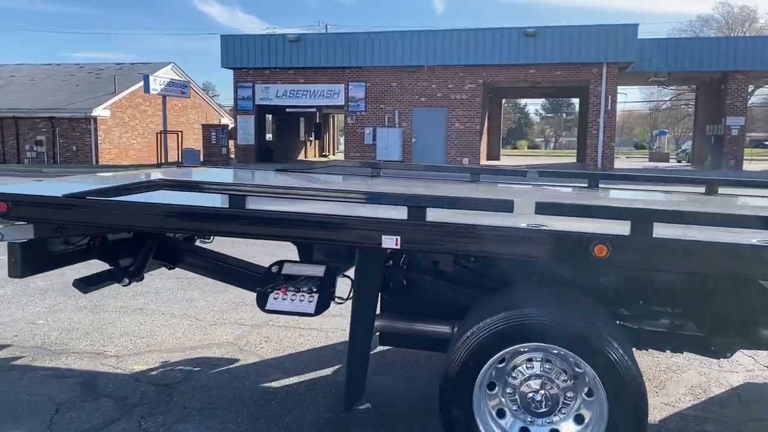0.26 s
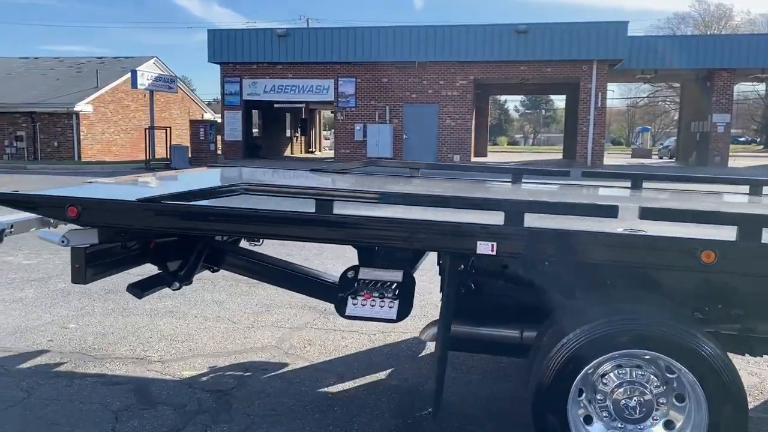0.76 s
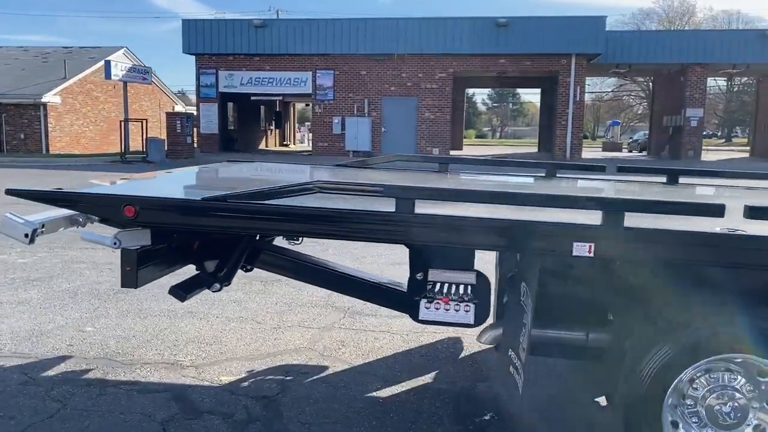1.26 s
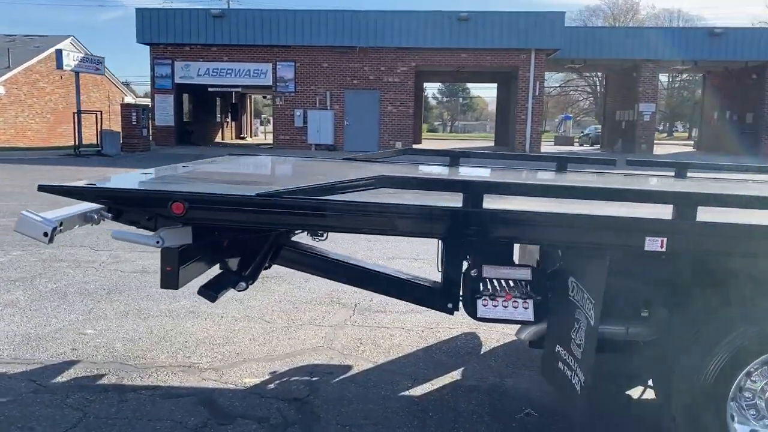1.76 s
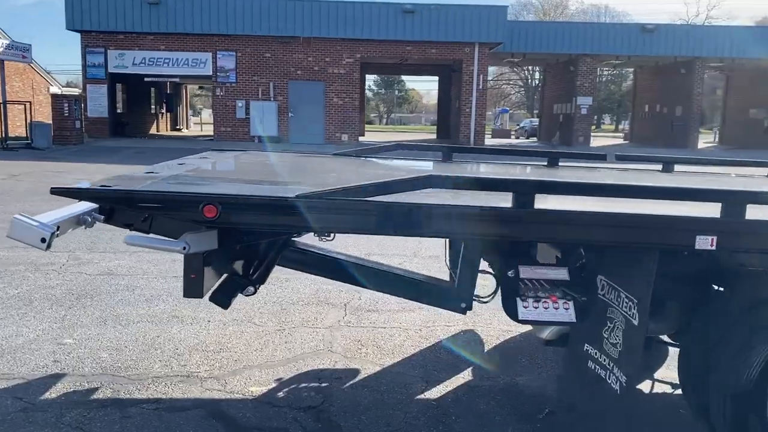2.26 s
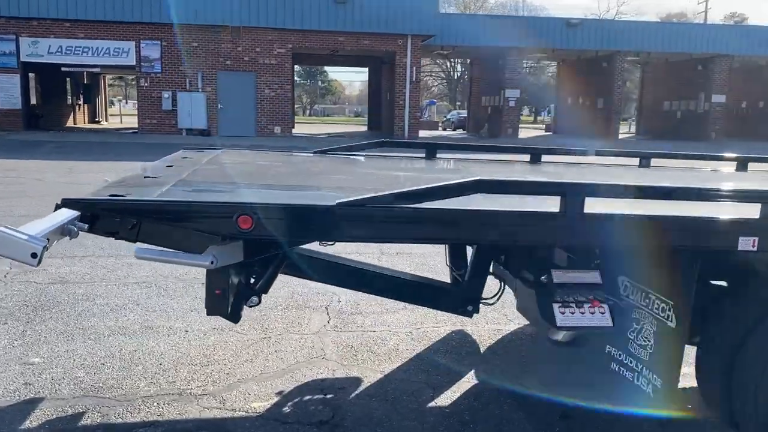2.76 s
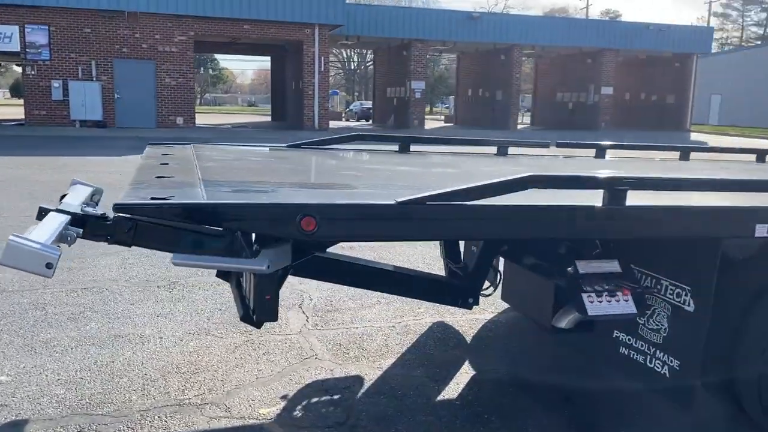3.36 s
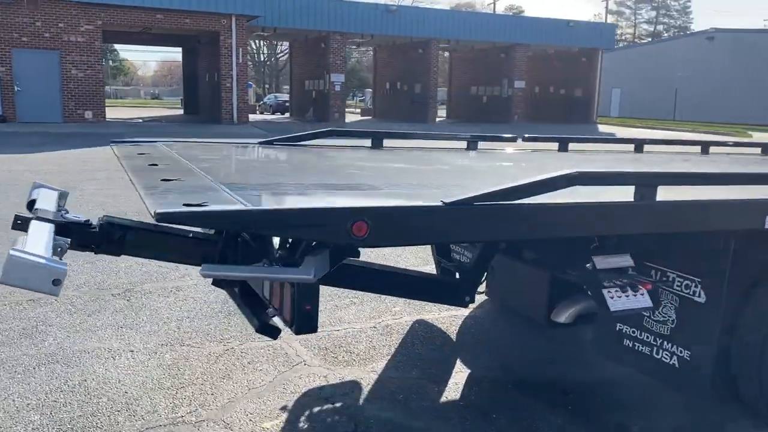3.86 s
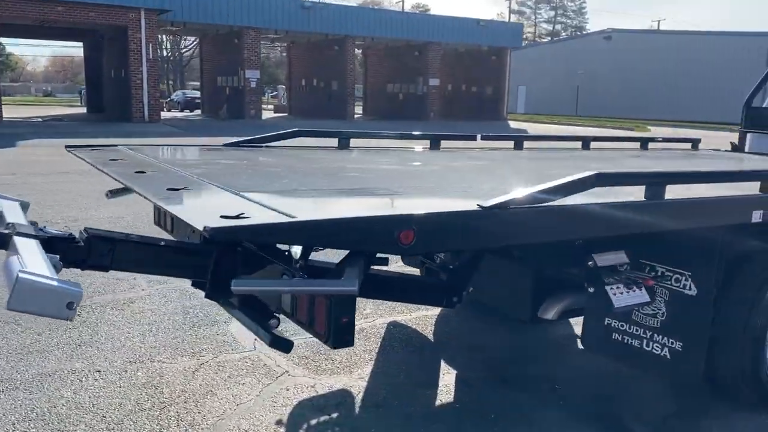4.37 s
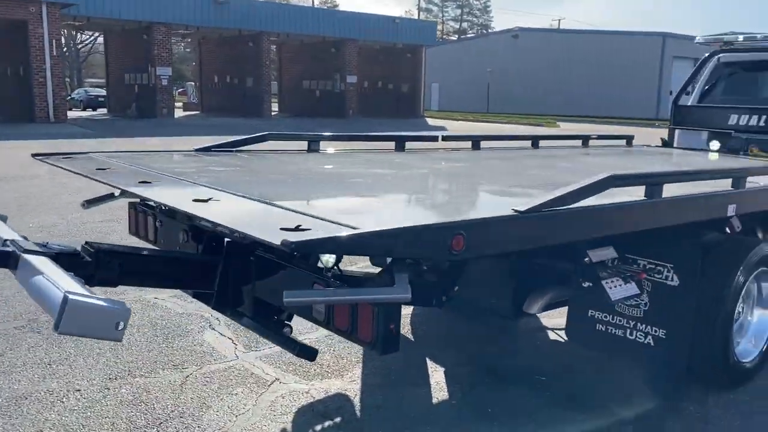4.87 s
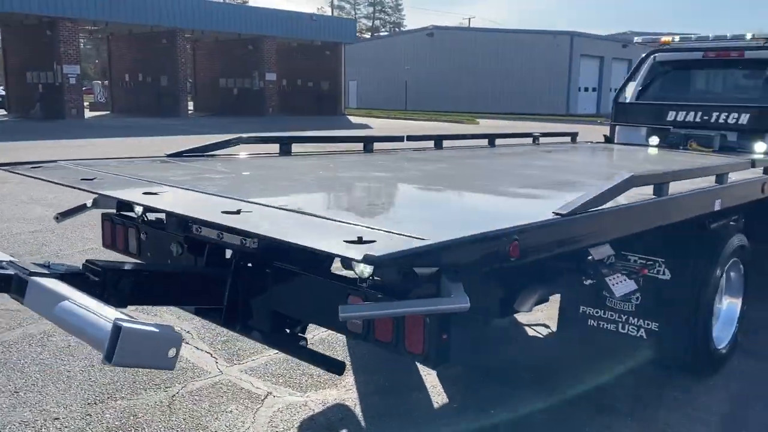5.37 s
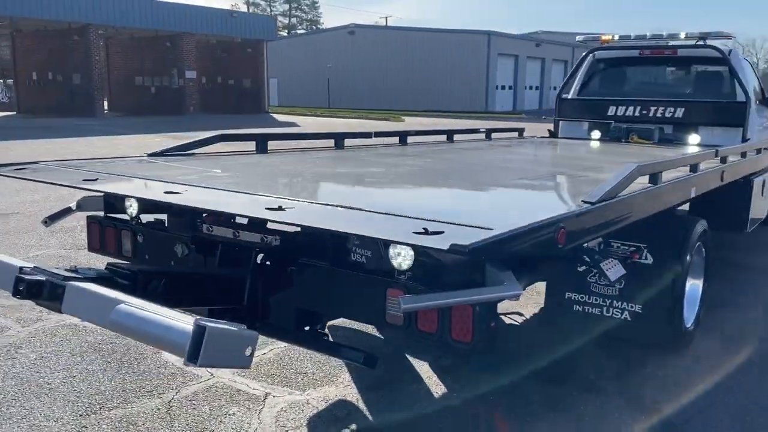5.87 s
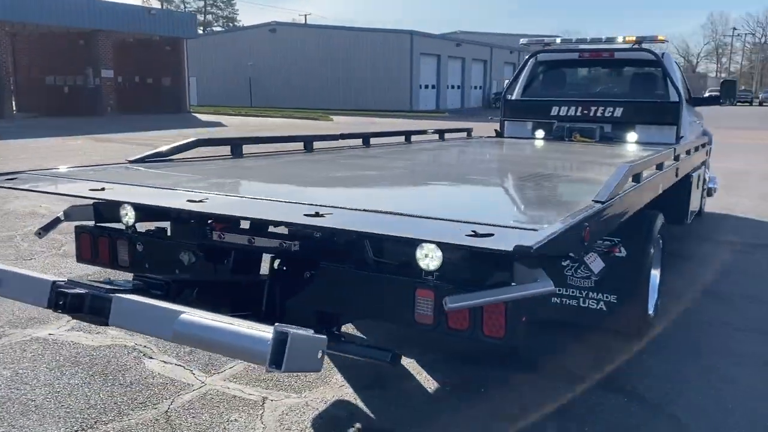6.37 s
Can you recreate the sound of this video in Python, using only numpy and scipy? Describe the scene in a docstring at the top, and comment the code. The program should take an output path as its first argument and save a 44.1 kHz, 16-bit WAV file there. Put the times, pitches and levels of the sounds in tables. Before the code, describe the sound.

Heard by someone walking along it outdoors, a diesel truck idles steadily with a low pulsing hum, growl and clatter, plus faint whine and hiss. Puffs of exhaust hit the microphone with low thumps, and the low end drops for a moment. After a single metallic tick and a light rattle, the highs soften and the deep hum grows stronger at the rear.

```python
"""A six-cylinder diesel tow truck idles on an open lot; the listener walks from its side to the rear.
From the start the exhaust hums and throbs, the engine growls and knocks, belt and pump whine, a fan hisses.
From 2.3 to 3.8 s the exhaust stream buffets the microphone; as that ends, the bass dips briefly.
At 4.3 s metal ticks once. Round the rear corner loose parts rattle and the body shades the treble.
The walk ends behind the truck, where the hum is loudest."""
import sys
import numpy as np
from scipy import signal
from scipy.fft import rfft, irfft
from scipy.io import wavfile
from scipy.ndimage import uniform_filter1d

SR = 44100
rng = np.random.default_rng(int(sys.argv[2]) if len(sys.argv) > 2 else 0)


def to_wav(sig):
    """Store sig (one row per channel, or 1-D mono) as 16-bit WAV at the path in sys.argv[1].

    Samples outside -1..1 are clipped; the rate is SR.
    """
    pcm = np.clip(np.atleast_2d(sig), -1, 1) * 32767
    pcm = np.round(pcm).astype(np.int16)
    wavfile.write(sys.argv[1], SR, pcm.T)  # frames by channels


N = 291920
TIME = np.arange(N) / SR
BINS_HZ = np.arange(N // 2 + 1) * SR / N
CYCLE_HZ, CYLINDERS, FIRST_FIRING_S = 5.82, 6, 0.02472


def from_db(db):
    return 10 ** (np.asarray(db) / 20)


def unit_rms(x):
    return x / np.sqrt(np.mean(x ** 2) + 1e-20)


def swell(at_s, width_s, t=TIME):
    """Bell curve of height 1."""
    return np.exp(-.5 * ((t - at_s) / width_s) ** 2)


def envelope(start_s, attack_s, hold_s, release_s):
    """Linear rise to 1, hold, exponential release."""
    age_s = TIME - start_s
    return np.clip(age_s / attack_s, 0, 1) * np.exp(-np.maximum(age_s - attack_s - hold_s, 0) / release_s)


def drift(rate_hz):
    """Smooth random motion, rms 1."""
    return unit_rms(irfft(rfft(rng.standard_normal(N)) / (1 + (BINS_HZ / rate_hz) ** 2) ** 2, N))


def resonance(x, hz, width_hz):
    """Two-pole resonator, peak gain 1."""
    r = np.exp(-np.pi * width_hz / SR)
    feedback = [1, -2 * r * np.cos(2 * np.pi * hz / SR), r * r]
    return signal.lfilter(np.array([1, 0, -1]) * (1 - r * r) / 2, feedback, x)


def per_bin(rows):
    """Table columns interpolated over log frequency."""
    hz, *columns = np.transpose(rows)
    return [np.interp(np.log(np.maximum(BINS_HZ, 1)), np.log(hz), column) for column in columns]


def colour(x, spectrum):
    """Spectral shaping with 24 dB/octave skirts."""
    db, = per_bin(spectrum)
    hz = np.maximum(BINS_HZ, 1)
    skirts = np.minimum(1, np.minimum(hz / spectrum[0][0], spectrum[-1][0] / hz)) ** 4
    return irfft(rfft(x) * from_db(db) * skirts, N)


# Stereo image: f/Hz, coherence/0-1, left lead/rad, left minus right/dB
PORT_IMAGE = [(60, .8, .05, .5), (200, .8, .3, .5), (420, .7, .9, 1.3), (520, .68, 1.1, .8),
              (700, .58, 1.9, -1.4), (860, .25, 1.8, -.6), (1100, .56, 1.4, -1.8), (1400, .68, 2.05, -.8),
              (1900, .48, 1.3, 2.3), (2250, .15, 0, 4.5), (2800, .6, -.8, 6), (3300, .75, -.6, 4.5),
              (3700, .92, 0, 3.5), (5500, .85, 0, 4), (7500, .8, 0, .5), (8500, .25, 0, 0)]


def at_ports(pair):
    """Direct and scattered signal to the left and right microphone ports, rms 1."""
    coherence, lead_rad, balance_db = per_bin(PORT_IMAGE)
    sides = np.array([[1], [-1]])
    direct, scattered = rfft(pair)
    both = np.sqrt(1 + coherence) * direct + np.sqrt(1 - coherence) * scattered * sides
    return unit_rms(irfft(both * from_db(sides * balance_db / 2) * np.exp(.5j * sides * lead_rad), N))


# Listener's path: t/s, share of the way from side to rear/0-1
WALK_PATH = [(0, 0.2), (2.8, 0.08), (4.2, 0.47), (6.62, 1)]


def along_walk(side, rear):
    """Crossfade of a level or signal from beside the truck to behind it."""
    return side + (rear - side) * np.interp(TIME, *np.transpose(WALK_PATH))


def side_to_rear(pair, side_spectrum, rear_spectrum):
    """Stereo noise whose colour follows the walk."""
    return along_walk(at_ports(colour(pair, side_spectrum)), at_ports(colour(pair, rear_spectrum)))


def near_db():
    """Boost over the first steps, nearer the engine."""
    return 2 * swell(at_s=0, width_s=0.63)


def treble_gain(shade_from_s=4.5, shade_db_per_s=3.5):
    """Up near the engine; shaded by the body past the corner."""
    return from_db(near_db() - shade_db_per_s * np.maximum(TIME - shade_from_s, 0))


def cyclic_noise(repeat_share, turns):
    """Noise pair that partly recurs every engine cycle, its pattern slowly changing."""
    period = round(SR / CYCLE_HZ)
    first, second = rng.standard_normal((2, 2, period))[:, :, np.arange(N) % period]
    angle = 2 * np.pi * turns * TIME / TIME[-1]
    pattern = first * np.cos(angle) + second * np.sin(angle)
    return np.sqrt(repeat_share) * pattern + np.sqrt(1 - repeat_share) * rng.standard_normal((2, N))


def firing_bursts(cylinder_db, delay_s, decay_s, depth, uneven_db):
    """Gain that swells and decays at each firing; cylinders and cycles differ."""
    firing_hz = CYCLE_HZ * CYLINDERS
    firings = (TIME - FIRST_FIRING_S - delay_s) * firing_hz
    number = np.floor(firings).astype(int)
    age = (firings - number) / firing_hz / decay_s
    chance_db = uneven_db * np.clip(rng.standard_normal(N)[number], -2, 1)
    size = from_db(np.array(cylinder_db)[number % CYLINDERS] + chance_db)
    return 1 - depth + depth * unit_rms(size * age * np.exp(-age))


# Six firings on the block: relative level/dB
BLOCK_FIRINGS_DB = [1.7, 5.3, 3.5, 4.2, 1.5, 3.1]


def block_bursts(**shape):
    """Firing pulsation of the engine block."""
    return firing_bursts(BLOCK_FIRINGS_DB, **shape)


def high_hiss(level_db=-70):
    """Faint, steady, very high hiss around 11 kHz."""
    spectrum = [(8500, -56), (10500, 34), (12000, 24), (15500, -11)]   # f/Hz, relative level/dB
    return from_db(level_db) * at_ports(colour(rng.standard_normal((2, N)), spectrum))


def whistle(hz=7450, width_hz=420, level_db=-66):
    """Airy narrow-band noise, strongest at the corner."""
    band = resonance(rng.standard_normal((2, N)), hz, width_hz)
    band = resonance(band, hz, width_hz)
    return from_db(level_db) * swell(at_s=4.2, width_s=1.25) * at_ports(band)


def tone(hz, wobble_hz, flutter_db):
    """Slightly unsteady stereo tone, rms 1."""
    phase = 2 * np.pi * np.cumsum(hz + wobble_hz * drift(23)) / SR
    direct = np.cos(phase) * from_db(flutter_db * drift(16))
    scattered = np.sin(phase) * drift(27)
    return at_ports(np.array([direct, scattered]))


def beam_gain(side_db, rear_db, beams):
    """A tone swells wherever it beams at the listener."""
    boost_db = sum(db * swell(at_s, width_s) for at_s, width_s, db in beams)
    return from_db(along_walk(side_db, rear_db) + boost_db)


# Pump pitch: t/s, f/Hz
PUMP_CURVE = [(0, 1920), (0.4, 1920), (0.7, 1923), (2.3, 1924.5), (2.7, 1926), (4.6, 1927.5), (5.0, 1930),
              (6.62, 1929.5)]
# Pump harmonics: multiple, side level/dB, rear level/dB, beams [t/s, width/s, boost/dB]
PUMP_HARMONICS = [(1, -71, -66, [(.62, .11, 12), (1.95, .14, 13), (4.8, .5, 7)]),
                  (2, -71, -77, [(.55, .35, 11.5), (2.38, .14, 8), (2.95, .45, 8.5), (3.8, .2, 5)]),
                  (3, -70, -77, [(2.5, .3, 4), (4.05, .22, 9), (4.72, .3, 8.5)]),
                  (4, -72, -77, [(.3, .2, 7), (3.95, .16, 7), (5.05, .2, 4)])]


def pump():
    """Thin whine, creeping up in pitch."""
    hz = np.interp(TIME, *np.transpose(PUMP_CURVE))
    return sum(beam_gain(*levels) * tone(hz * multiple, wobble_hz=2.8, flutter_db=2.2)
               for multiple, *levels in PUMP_HARMONICS)


# Fan spectrum: f/Hz, relative level/dB
FAN_SPECTRUM = [(2800, -5), (4200, 0), (5500, -.5), (6700, -.5), (7650, 1.5), (8300, -9), (11000, -8),
                (15500, -11)]


def fan(level_db=-55.5):
    """Air hiss, pulsing lightly with the firings."""
    air = rng.standard_normal((2, N))
    air *= block_bursts(delay_s=-0.0046, decay_s=0.0067, depth=0.17, uneven_db=3)
    return from_db(level_db) * treble_gain() * at_ports(colour(air, FAN_SPECTRUM))


# Tick modes: f/Hz, peak level/dB, decay/s
METAL_MODES = [(1550, -38, .003), (2750, -38, .002), (4100, -34, .0026), (4900, -39, .0014),
               (7000, -43, .001), (11500, -47, .001)]


def tick(at_s=4.2685, crack_db=-36, crack_s=0.00074):
    """One metallic tick: a crack and short modes."""
    age_s = np.maximum(TIME - at_s, 0)
    crack = from_db(crack_db) * rng.standard_normal(N) * (age_s > 0) * np.exp(-age_s / crack_s)
    return crack + sum(from_db(db) * np.exp(-age_s / decay_s) * np.sin(2 * np.pi * hz * age_s)
                       for hz, db, decay_s in METAL_MODES)


# Modes of loose parts: f/Hz, width/Hz, relative level/dB
LOOSE_MODES = [(1020, 84, 11), (1290, 70, -4), (1430, 130, 7), (1700, 120, 4), (1980, 130, 1),
               (2130, 260, 5)]


def rattle(hits_per_s=300, uneven_db=2.5, level_db=-51):
    """Loose parts chatter under the bed, heard round the rear corner."""
    hits = np.flatnonzero(rng.random(N) < hits_per_s / SR)
    force = from_db(uneven_db * rng.standard_normal(len(hits)))
    out = 0
    for hz, width_hz, db in LOOSE_MODES:
        clicks = np.zeros((2, N))
        clicks[:, hits] = force * rng.uniform(-1, 1, (2, len(hits)))
        out += from_db(db) * unit_rms(resonance(clicks, hz, width_hz))
    return from_db(level_db) * swell(at_s=4.8, width_s=0.45) * at_ports(out)


# Injector spectrum: f/Hz, relative level/dB
INJECTOR_SPECTRUM = [(1900, -29), (2300, 0), (2600, 1), (2820, -3), (2980, 1.5), (3250, 2), (3550, -4),
                     (4300, -3.5), (5300, -9), (6500, -16)]


def injectors(level_db=-51.17):
    """Injector rasp, pulsing with the firings."""
    spray = cyclic_noise(repeat_share=0.074, turns=0.79)
    spray *= block_bursts(delay_s=-0.0056, decay_s=0.01, depth=0.21, uneven_db=7)
    return from_db(level_db) * treble_gain() * at_ports(colour(spray, INJECTOR_SPECTRUM))


# Struck parts: place in cycle/firings, f/Hz, peak level/dB, loudest at t/s, width/s
STRUCK_PARTS = [(0.018, 1380, -39.5, 4.5, 0.66), (0.027, 3275, -48, 3.3, 0.6),
                (0.819, 1446, -39.5, 4.1, 1.5), (1, 225, -31.5, 5.8, 1.3), (1.119, 3140, -51, 2.6, 1.2),
                (1.201, 1130, -41.5, 2.8, 1.2), (1.199, 1977, -46, 4.2, 1.2),
                (1.242, 1443, -35.5, 4.7, 0.49), (1.799, 439, -41.5, 0.81, 2), (1.83, 1500, -49, 4.9, .6),
                (2.02, 1097, -41, 1.4, 1.4), (2.1, 1510, -45, 4.8, 0.56), (2.13, 3200, -60, 5.4, 1.5),
                (2.818, 1350, -40, 2.1, 1.5), (2.821, 2520, -44.5, 5.37, 0.27), (2.9, 708, -41.5, 3.5, 1.9),
                (2.919, 4410, -54, 2, 3.1), (3.259, 1468, -36.5, 4.26, 1.2), (3.548, 289, -34, 1.9, 1.8),
                (3.929, 407, -35, 0.61, 1.8), (3.949, 1914, -44.5, 4.6, 1.5), (4.031, 3220, -52, 2.6, 2.4),
                (4.07, 1090, -59, 5.5, 0.76), (4.102, 1460, -42, 4.5, 0.67), (5.12, 2985, -52.5, 1.2, 1.5),
                (5.169, 1040, -40.5, 3.84, 0.51), (5.67, 1460, -43, 4.8, 0.28)]


def clatter(rise_s=0.0015, ring_s=0.0074, uneven_db=2, jitter_s=0.0005, neighbours=0.27, scattered=0.3):
    """Parts struck once a cycle ring with a main mode and two neighbours of random strength."""
    age_s = np.arange(SR // 25) / SR
    ring = (1 - np.exp(-age_s / rise_s)) * np.exp(-age_s / ring_s)
    ring /= ring.max()
    mode_ratios = np.array([[1], [0.892], [1.108]])
    out = np.zeros((2, N + SR))
    for place, hz, db, loudest_s, width_s in STRUCK_PARTS:
        modes = ring * np.sin(2 * np.pi * hz * mode_ratios * age_s)
        for cycle in range(int(TIME[-1] * CYCLE_HZ) + 1):
            force, late, lower, upper, *echo = rng.standard_normal(7)
            at_s = FIRST_FIRING_S + (cycle + place / CYLINDERS) / CYCLE_HZ + jitter_s * late
            gain = from_db(db + uneven_db * force) * swell(loudest_s, width_s, at_s)
            weights = np.array([[1, neighbours * lower, neighbours * upper], scattered * np.array(echo)])
            start = max(int(at_s * SR), 0)
            out[:, start:start + len(age_s)] += gain * weights @ modes
    return at_ports(out[:, :N]) * np.sqrt(np.mean(out[0, :N] ** 2))


# Engine and belt tones: f/Hz, side level/dB, rear level/dB, beams [t/s, width/s, boost/dB]
ENGINE_AND_BELT_TONES = [(76.5, -44, -57, [(0.3, 0.4, 6.5)]), (153, -40.5, -54.5, [(1.05, 0.9, 5.5)]),
                         (374.3, -56.5, -62.5, [(1.3, 0.98, 8)]), (489.4, -60, -66, [(2.65, 0.26, 6),
                         (3.85, 0.36, 12.5), (5.6, 0.36, 10.5)]), (686.6, -66, -58, [(3.2, 0.3, 9.5),
                         (4.15, 0.6, 12)]), (1750, -60, -66, [(2.1, 0.13, 6.5)])]


def engine_and_belt_tones():
    """Wavering tones of the engine and its belt drive."""
    return sum(beam_gain(*levels) * tone(hz, wobble_hz=1.216, flutter_db=2.5)
               for hz, *levels in ENGINE_AND_BELT_TONES)


# Growl spectra, side and rear: f/Hz, relative level/dB
GROWL_AT_SIDE = [(200, 4.5), (265, -2.5), (320, -7.5), (385, -2.5), (450, -4), (510, -3.5), (590, -12),
                 (680, -17)]
GROWL_AT_REAR = [(200, -13), (265, -7), (320, -15), (385, -2), (440, -1.5), (495, -2.5), (590, -15.5),
                 (680, -24)]


def growl(side_db=-43.5, rear_db=-52):
    """Combustion shakes the block, much alike each cycle."""
    shake = cyclic_noise(repeat_share=0.76, turns=0.54)
    shake *= block_bursts(delay_s=0.015, decay_s=0.0036, depth=0.27, uneven_db=2.5)
    return from_db(along_walk(side_db, rear_db)) * side_to_rear(shake, GROWL_AT_SIDE, GROWL_AT_REAR)


# Knock spectra, side and rear: f/Hz, relative level/dB
KNOCK_AT_SIDE = [(540, 0), (590, -3.5), (690, 2), (800, -2.5), (930, -3.5), (1060, 1.5), (1230, -4.5),
                 (1430, 1), (1630, -8), (1950, -8), (2200, -9), (2500, -14.5)]
KNOCK_AT_REAR = [(540, -0.5), (590, -2), (690, 3), (800, 0), (930, 1.5), (1060, -1.5), (1230, 0),
                 (1480, -3), (1650, -6.5), (1950, -4.5), (2200, -8), (2500, -11.5)]


def knock(side_db=-44, rear_db=-44.5, corner_db=0.6):
    """Combustion knock; at the corner it also carries along the underside of the bed."""
    blows = cyclic_noise(repeat_share=0.42, turns=0.71)
    blows *= block_bursts(delay_s=-0.0039, decay_s=0.0086, depth=0.26, uneven_db=4)
    level_db = along_walk(side_db, rear_db) + near_db() + corner_db * swell(at_s=3.5, width_s=0.74)
    return from_db(level_db) * side_to_rear(blows, KNOCK_AT_SIDE, KNOCK_AT_REAR)


# Gusts: t/s, length/s, level/dB
STREAM_GUSTS = [(2.284, 0.057, -27.5), (2.629, 0.048, -31.5), (2.913, 0.16, -25.5), (3.148, 0.16, -25),
                (3.435, 0.038, -22), (3.558, 0.067, -58)]
# Eddy spectrum: f/Hz, relative level/dB
EDDY_SPECTRUM = [(20, -29), (40, -15), (68, 3), (105, -5.5), (170, -13), (280, -23), (450, -35.5),
                 (900, -59)]
# Puffs: t/s, peak level/dB, f/Hz
STREAM_PUFFS = [(2.334, -26, 94), (2.458, -25, 70), (2.508, -21, 115), (2.638, -21.5, 71),
                (2.938, -17.5, 193), (2.965, -15.5, 67), (3.017, -27, 64), (3.05, -18, 66),
                (3.182, -16.5, 113.4), (3.243, -18, 81), (3.284, -19, 70.4), (3.311, -19, 84.5),
                (3.474, -13.5, 95), (3.584, -22.5, 196), (3.639, -25, 273), (3.74, -23.5, 261),
                (3.764, -23, 308)]


def exhaust_stream(attack_s=0.014, release_s=0.044, puff_rise_cycles=0.71):
    """Exhaust gas blows across the microphone in gusts and single puffs."""
    flow = sum(from_db(db) * envelope(at_s, attack_s, length_s - attack_s, release_s)
               for at_s, length_s, db in STREAM_GUSTS)
    out = flow * at_ports(colour(rng.standard_normal((2, N)), EDDY_SPECTRUM))
    for at_s, db, hz in STREAM_PUFFS:
        cycles = np.maximum(TIME - at_s, 0) * hz
        age = cycles / puff_rise_cycles
        out += from_db(db) * age * np.exp(1 - np.minimum(age, 50)) * np.sin(2 * np.pi * cycles)
    return out


def bass_dip(depth_db, hold_s, return_s, start_s=3.565, fall_s=0.33):
    """Gain of the brief dip in the bass."""
    return from_db(-depth_db * envelope(start_s, fall_s, hold_s, return_s))


# Six firings in the exhaust: relative level/dB
EXHAUST_FIRINGS_DB = [-2, -3.5, -7, -6.5, -4.2, -4]
# Rumble spectra, side and rear: f/Hz, relative level/dB
RUMBLE_AT_SIDE = [(32, -24), (42, -6), (56, 0), (80, -5), (115, -5), (160, -6), (200, -18), (260, -12),
                  (330, -18)]
RUMBLE_AT_REAR = [(32, -31), (42, -6), (56, 0), (85, 0.5), (125, -3.5), (160, -11), (200, -7.5),
                  (260, -24.5), (330, -23)]


def exhaust_rumble(side_db=-33.5, rear_db=-31):
    """Turbulent gas, throbbing at each firing."""
    gas = cyclic_noise(repeat_share=0.15, turns=0.33)
    gas *= firing_bursts(EXHAUST_FIRINGS_DB, delay_s=-0.01, decay_s=0.0085, depth=0.67, uneven_db=1)
    return from_db(along_walk(side_db, rear_db)) * side_to_rear(gas, RUMBLE_AT_SIDE, RUMBLE_AT_REAR)


# Hum tones: multiple of the cycle rate, relative side level/dB, relative rear level/dB
HUM_TONES = [(9, -8, -14), (12, -4.5, -4.5), (14, -20, -13), (16, -20, -13), (18, -2, 2.5), (21, -2.5, -4),
             (22, -15, -13), (23.055, 2, -0.5), (24, -3, 0.5), (27, -1.5, 0), (29, -17, -11),
             (30, .5, -1.5), (33, -16, -7), (35, -8, -19), (36, -9, -19), (39, -10, -15), (41, -10, -23),
             (42, -14, -19), (45, -11, -18), (48, -14, -26), (51, -15, -28)]


def exhaust_hum(side_db=-36, rear_db=-26, waver_db=0.5, delay_s=-0.0293, left_lead_s=0.00029):
    """Engine orders swell together at strong firings; pipe echoes and turbulence scatter their phases."""
    port_lead_s = left_lead_s * np.array([[.5], [-.5]])
    cycles = (TIME - FIRST_FIRING_S - delay_s + port_lead_s) * CYCLE_HZ
    out = np.zeros((2, N))
    # A separate tone near 134 Hz beats slowly against the engine orders.
    for multiple, *levels_db in HUM_TONES:
        gain = from_db(along_walk(*levels_db) + waver_db * drift(0.91))
        scatter_rad = 0.79 * drift(0.26) + 0.11 * drift(11)
        out += gain * np.sin(2 * np.pi * multiple * cycles - np.pi / 4 + scatter_rad)
    running_rms = np.sqrt(uniform_filter1d(np.mean(out ** 2, axis=0), size=4 * round(SR / CYCLE_HZ)))
    return from_db(along_walk(side_db, rear_db)) * out / running_rms


# Harder firings: t/s, boost/dB
HARD_FIRINGS = [(0.051, 6.5), (0.346, 7), (0.398, 8), (0.573, 8.5), (0.745, 3), (0.857, 7.5), (0.915, 4.5),
                (1.085, 4.5), (1.224, 5), (1.427, 5), (1.49, 6), (1.755, 0), (1.94, 1), (4.178, 4.5),
                (4.347, 3.5), (4.462, 2.5), (5.265, 2), (6.183, 0.5), (6.355, 2.5), (6.525, 2)]


def exhaust(thump_width_s=0.0065, deep_hz=61):
    """Rumble and hum, some firings thumping harder; in the dip the deepest bass stays down longest."""
    out = exhaust_rumble() * bass_dip(depth_db=15, hold_s=0.13, return_s=0.59)
    out += exhaust_hum() * bass_dip(depth_db=8, hold_s=0.13, return_s=0.077)
    out *= from_db(sum(db * swell(at_s, thump_width_s) for at_s, db in HARD_FIRINGS))
    deep = signal.sosfiltfilt(signal.butter(3, deep_hz, fs=SR, output="sos"), out)
    return out - deep + deep * bass_dip(depth_db=11, hold_s=0.55, return_s=0.6)


def scene():
    truck = exhaust() + growl() + knock() + injectors() + fan() + clatter()
    truck += engine_and_belt_tones() + pump() + whistle() + rattle() + tick()
    return truck + exhaust_stream() + high_hiss()


def record(dry, cutoff_hz=15800):
    """Steep low-pass."""
    return signal.sosfilt(signal.ellip(10, .1, 90, cutoff_hz, fs=SR, output="sos"), dry)


dry = scene()
out = record(dry)
to_wav(out)
```